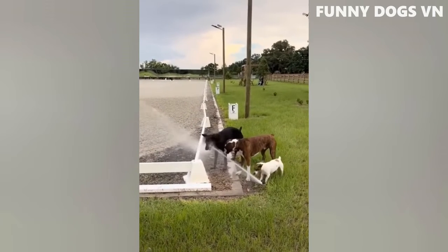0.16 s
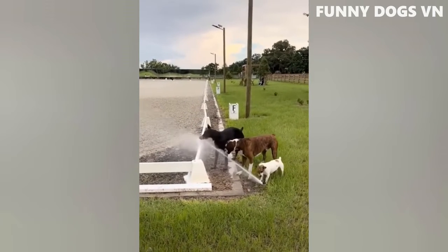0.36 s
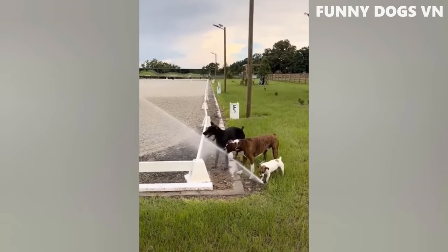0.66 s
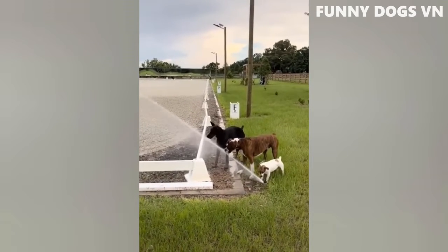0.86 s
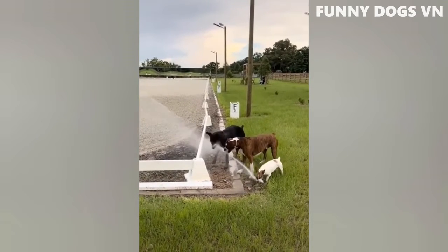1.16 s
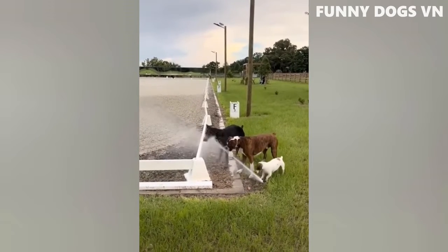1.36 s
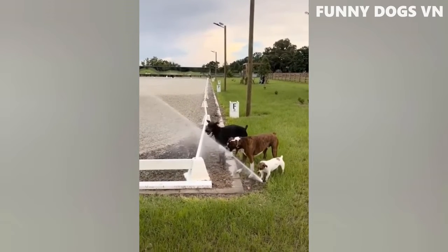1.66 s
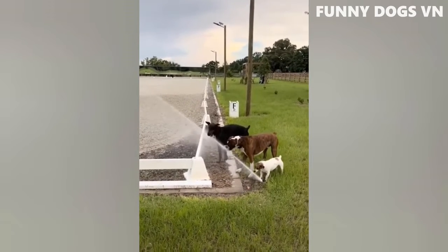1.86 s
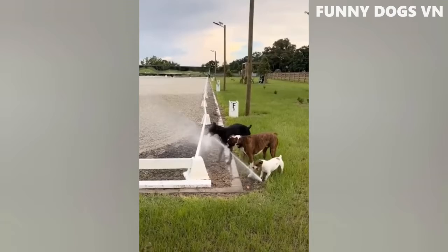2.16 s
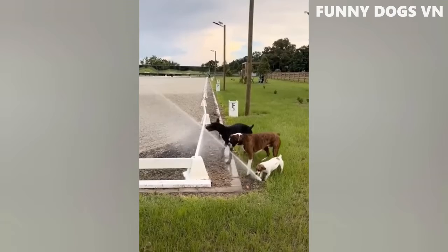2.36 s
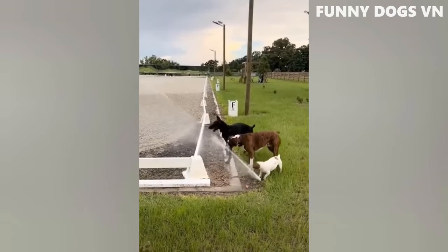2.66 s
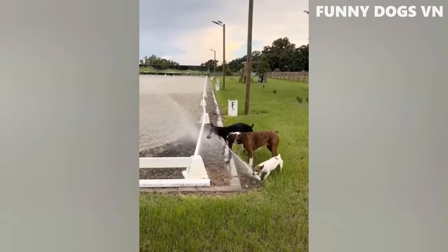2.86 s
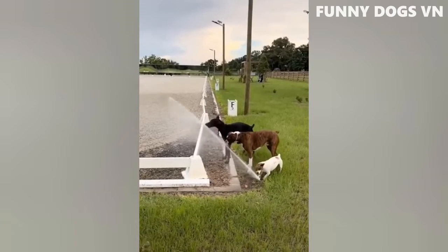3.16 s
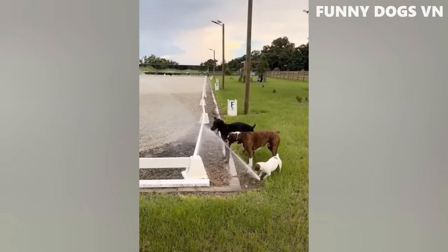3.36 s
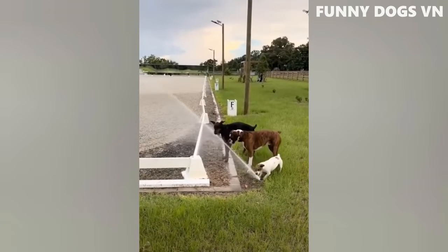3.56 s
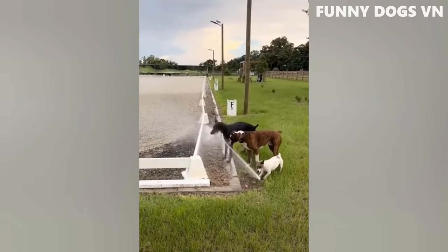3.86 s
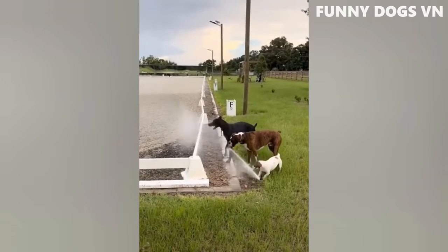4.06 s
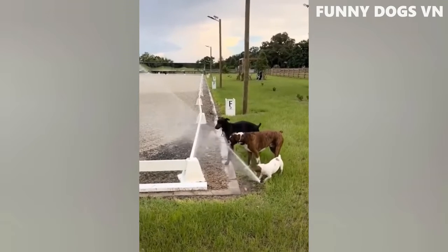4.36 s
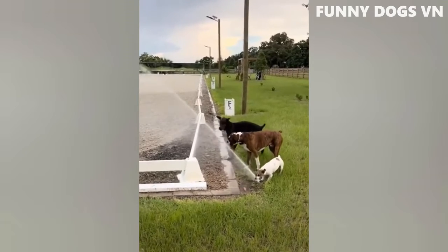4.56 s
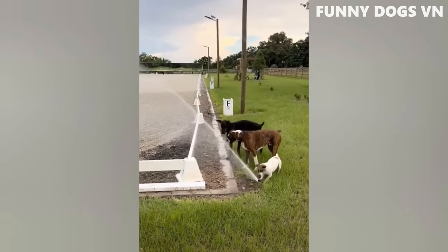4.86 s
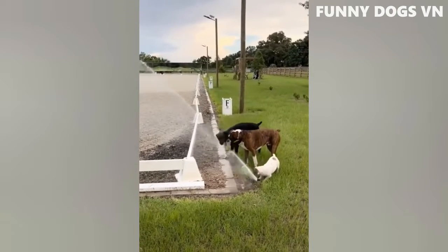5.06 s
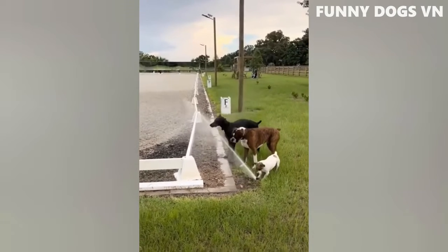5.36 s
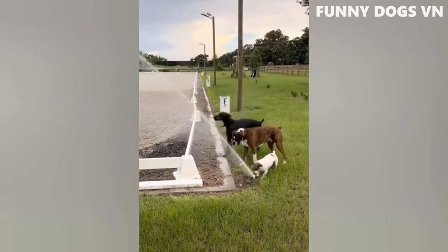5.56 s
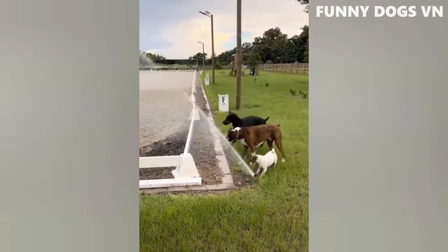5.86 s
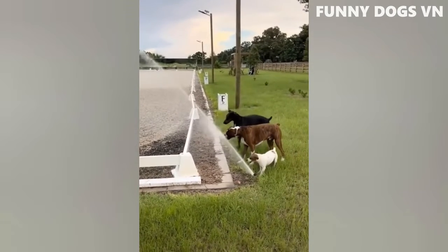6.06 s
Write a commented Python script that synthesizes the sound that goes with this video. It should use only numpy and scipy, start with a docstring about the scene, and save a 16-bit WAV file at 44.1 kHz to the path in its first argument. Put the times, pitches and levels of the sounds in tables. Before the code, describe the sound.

A lawn sprinkler hisses softly throughout over a low, uneven outdoor rumble, a few metres straight ahead in an open field with no echo. At 0.2 seconds a dog's quick bite breaks the jet into a rasping burst of drops. From 0.4 to 0.7 a muzzle stays in the water and the open mouth rings hollow. Jaws clop dully around 0.7 and 1.1 amid misty spurts. Further bites come near 1.4, 2.2 and 2.8, mixed with brief drinks and sharp wet slaps. The strongest, busiest stretch runs from 3.1 to 4.5, with splashy snaps, clops and a longer gargling drink just after 4. More snaps follow near 4.9 and 5.3, then another hollow drink at 5.4 and a clop at 5.7. Around 6 seconds paws thud softly twice on turf around one last bite, which trails into mist.

```python
"""Three dogs snap at the jet of a lawn sprinkler, a few metres away in an open field.
From the start the free jet hisses softly over a low outdoor rumble. A first quick bite breaks it into
a rasping burst of drops; then a muzzle stays in the water, the open mouth rings hollow, and jaws clop.
Bites and drinks keep trading places, with misty spurts between them and wet slaps on the jaws.
Near 6 s paws thud softly on the turf around one last bite."""
import sys
import numpy as np
from scipy import signal
from scipy.fft import rfft, irfft, next_fast_len
from scipy.io import wavfile
from scipy.ndimage import uniform_filter1d, map_coordinates

SR = 44100
rng = np.random.default_rng(int(sys.argv[2]) if len(sys.argv) > 2 else 0)


def transcribe(signal):
    """Save signal, clipped to [-1, 1], as a 16-bit WAV file at the path in sys.argv[1]."""
    frames = np.atleast_2d(signal).T
    limited = np.clip(frames, -1, 1)
    pcm = np.round(limited * 32767).astype(np.int16)
    wavfile.write(sys.argv[1], SR, pcm)


N = 274081


def amp(db):
    """Decibels to gain."""
    return 10 ** (np.asarray(db) / 20)


def unit(x):
    """Scale to rms 1."""
    return x / np.sqrt(np.mean(x ** 2) + 1e-20)


def eq_gain(points, hz):
    """Gain of an EQ curve whose (f/Hz, level/dB) points are joined on a log axis."""
    f, db = np.transpose(points)
    return amp(np.interp(np.log(hz + 1), np.log(f + 1), db))


def fader(points):
    """A fader ride through (t/s, level/dB) points, in dB for every sample."""
    return np.interp(np.arange(N) / SR, *np.transpose(points))


def wobble(rate):
    """A smooth random modulator, rate knots a second."""
    return map_coordinates(rng.standard_normal(int(N * rate / SR) + 4), [np.arange(N) * rate / SR])


def filtered(x, response):
    """Filter x by a response given as a function of frequency."""
    size = next_fast_len(N + SR // 2)
    return irfft(rfft(x, size) * response(np.fft.rfftfreq(size, 1 / SR)), size)[..., :N]


def add(track, s, sound):
    """Mix a sound into a track from time s on."""
    room = track[..., round(s * SR):][..., :sound.shape[-1]]
    room += sound[..., :room.shape[-1]]


# Bottom of the outdoor bed: f/Hz, level/dB
RUMBLE_EQ = [(18, -36), (30, -15), (42, -7.5), (58, 1), (95, -1), (130, -9), (200, -21), (400, -42)]
# Upper bass of the bed: f/Hz, level/dB
MURMUR_EQ = [(70, -11), (130, 0), (170, 0), (240, -2), (320, -7.5), (480, -17.5), (1000, -24.5),
             (3000, -55)]
# Fader ride on that upper bass: t/s, level/dB
MURMUR_RIDE = [(0, -49), (.7, -51), (1.45, -47.5), (2.55, -50), (2.87, -44.3), (3.3, -48.5), (3.85, -46.5),
               (4.75, -48.5), (5.12, -52.5), (5.4, -45), (6.21, -51)]

def rumble():
    """The open air rumbles in soft, uneven swells, dead centre."""
    def noise(eq):
        return unit(filtered(rng.standard_normal(N), lambda hz: eq_gain(eq, hz)))
    deep = amp(-45.9 + 1.1 * wobble(9)) * noise(RUMBLE_EQ)
    murmur = amp(fader(MURMUR_RIDE) + 2.3 * wobble(16)) * noise(MURMUR_EQ)
    return deep + murmur


def knocks(cues, t60, attack_s, rough):
    """Short, dull rings whose pitch is blurred by what sloshes or gives way."""
    out, t = np.zeros(N), np.arange(SR // 5) / SR
    for s, db, hz in cues:
        drift = rough * np.cumsum(rng.standard_normal(len(t))) / np.sqrt(SR)
        envelope = amp(db + 4.5 - 60 * t / t60) * (1 - np.exp(-t / attack_s))
        add(out, s, envelope * np.sin(2 * np.pi * hz * t + drift))
    return out


# Footfalls: t/s, relative level/dB, f/Hz
PAW_CUES = [(.400, -41, 72), (3.27, -40, 62), (5.858, -30.5, 70), (6.065, -36.5, 110)]

def paw_thuds():
    """Paws land softly on turf that gives way."""
    return knocks(PAW_CUES, t60=.15, attack_s=.008, rough=4.4)


# Stereo width of the water: f/Hz, side level against mid/dB
SPRAY_WIDTH = [(200, -38), (450, -9.5), (1200, -15.5), (2400, -56), (3200, -29), (4000, -15.5), (7000, -12),
               (11000, -12.5), (13500, -5.5)]

def spray(eq, rate, share, patchy_db):
    """Single drops (rate a second, share of the power) over a wash, coloured by a shifting surface."""
    drops = (rng.random((2, N)) < rate / SR) * rng.standard_normal((2, N))
    impacts = np.sqrt(share) * unit(drops) + np.sqrt(1 - share) * rng.standard_normal((2, N))
    frames = signal.stft(impacts, nperseg=1024)[2]
    patches = uniform_filter1d(rng.standard_normal(frames.shape[1:]), size=3, axis=0)  # across pitch
    patches = unit(uniform_filter1d(patches, size=7, axis=1))  # across time
    pair = signal.istft(frames * amp(patchy_db * patches), nperseg=1024)[1][:, :N]
    mid = filtered(pair[0], lambda hz: eq_gain(eq, hz))
    side = filtered(pair[1], lambda hz: eq_gain(eq, hz) * eq_gain(SPRAY_WIDTH, hz))
    return np.array([mid + side, mid - side]) / np.std(mid)


# Tone of the free jet: f/Hz, level/dB
JET_EQ = [(200, -4.5), (500, 2.5), (1000, 0), (2000, -4.5), (4500, 1), (6500, -3.5), (8500, -1.5),
          (10500, -6.5), (12500, 0.5), (15400, -6.5)]
# Fader ride on the free jet: t/s, level/dB
JET_RIDE = [(0, -44.5), (1.7, -44.5), (2.7, -42.5), (3.4, -44.5), (4.7, -44.3), (5.15, -45.7), (6.21, -45)]

def free_jet():
    """The unbroken jet hisses at the nozzle and rains down on the sand."""
    gain = amp(fader(JET_RIDE) + .55 * wobble(3.86))
    return gain * spray(JET_EQ, rate=500, share=.19, patchy_db=1.2)


# Jaws shutting: t/s, relative level/dB, f/Hz
CLOP_CUES = [(0.734, -34.5, 214), (1.066, -25, 200), (1.103, -44, 161), (1.385, -32, 288),
             (3.204, -32, 190), (3.566, -27, 360), (3.999, -36, 167), (4.654, -37, 152),
             (5.674, -30.5, 495), (5.691, -30, 394)]

def jaw_clops():
    """A closing mouth gives a hollow clop."""
    return knocks(CLOP_CUES, t60=.072, attack_s=.0044, rough=13)


# Wet hits: t/s, level/dB, 60 dB decay/s
SLAP_CUES = [(.170, -36, .12), (.729, -31.5, .06), (.762, -38, .05), (1.068, -39, .06), (1.600, -21, 0.038),
             (1.936, -29.5, .05), (2.338, -25, .08), (2.803, -27.5, 0.12), (2.94, -28.5, 0.21),
             (3.172, -20, 0.034), (3.201, -22, 0.05), (3.250, -32, 0.071), (3.501, -23, .06),
             (3.616, -30, 0.08), (4.0, -26, .04), (4.356, -30, 0.14), (4.65, -39.5, .13),
             (4.853, -25.5, 0.11), (5.247, -24.5, 0.073), (5.674, -35, 0.07), (5.915, -22, .08),
             (6.028, -28, 0.092)]

def water_slaps(attack_s=.0013):
    """A slug of water bursts on a jaw and patters away."""
    envelope, t = np.zeros(N), np.arange(SR // 4) / SR
    for s, db, t60 in SLAP_CUES:
        add(envelope, s, amp(db - 60 * t / t60) * (1 - np.exp(-t / attack_s)))
    wet_eq = [(150, -21), (400, -5.5), (1000, -3.5), (3000, 2.5), (8500, .5), (15000, -6.5)]
    return envelope * spray(wet_eq, rate=1500, share=.5, patchy_db=2.5)


# Open mouths: start t/s, end t/s, low f/Hz, middle f/Hz, top f/Hz, relative level/dB, upper two trim/dB
GAPE_CUES = [(.355, .68, 1110, 1900, 2900, -29.3, -3), (1.425, 1.53, 1200, 1800, 2900, -31, -9),
             (2.325, 2.535, 930, 1770, 2630, -37, 6.3), (3.1, 3.215, 1170, 1690, 3180, -28.5, .5),
             (3.275, 3.36, 1030, 1750, 2570, -37, -1), (4.078, 4.135, 960, 1700, 2800, -26, -13),
             (4.16, 4.33, 1050, 1630, 3000, -40, 4), (5.415, 5.545, 1170, 1800, 3200, -30.3, -8),
             (5.668, 5.85, 880, 1720, 2780, -57, 5.5)]
# Resonances, entering low to top: start/share of gape, end/share of gape, pitch sag/share, trim/dB
FORMANTS = [(0, .82, .14, 0), (.06, .97, .05, -1), (.25, .99, .04, 0)]

def open_mouths(half_width_hz=138, trim_db=-1.5, gargle=.018, side_db=-19.5):
    """Water drums inside an open mouth, whose resonances glide with the jaw and waver as it fills."""
    out = np.zeros((2, N))
    pole = np.exp(-2 * np.pi * half_width_hz / SR)
    slosh = 1 + gargle * wobble(45)
    for opens, closes, *pitches, db, upper_db in GAPE_CUES:
        for hz, extra_db, (first, last, sag, formant_db) in zip(pitches, (0, upper_db, upper_db), FORMANTS):
            start = opens + first * (closes - opens)
            n = max(round((last - first) * (closes - opens) * SR), SR // 100)
            glide_hz = np.linspace(hz, hz * (1 - sag), n) * slosh[round(start * SR):][:n]
            carrier = np.exp(2j * np.pi * np.cumsum(glide_hz) / SR)
            # a gliding band-pass: shift the noise down, low-pass it, shift it back
            drive = rng.standard_normal((2, n)) / carrier
            ring = np.real(signal.lfilter([1], np.poly([pole, pole]), drive) * carrier)
            envelope = amp(db + extra_db + formant_db + trim_db) * signal.windows.tukey(n, .5)
            add(out, start, envelope * ring / ring.std(axis=1, keepdims=True))
    mid, side = out[0], amp(side_db) * out[1]
    return np.array([mid + side, mid - side])


def burst(s, hold, rise, fall, swell_db=0):
    """Start time and power envelope of one burst of spray; rise and fall are seconds per 20 dB."""
    hold, start = max(hold, 1 / SR), max(s - 2 * rise, 0)
    t = np.arange(start - s, hold + 2 * fall, 1 / SR)
    edges = np.maximum(-t, 0) / rise + np.maximum(t - hold, 0) / fall
    tilt_db = swell_db * (np.clip(t / hold, 0, 1) - .5)
    return start, amp(tilt_db - 20 * edges) ** 2


# Misty swells, spurts and trailing patter: peak t/s, rise/s, fall/s, level/dB
SPURT_CUES = [(.015, .136, .26, -48), (.286, .035, .138, -36.5), (.906, .24, .114, -37.3),
              (1.047, .151, .342, -44.5), (1.224, .144, .238, -38.4), (1.601, .044, .057, -31),
              (1.935, .088, .059, -36), (2.052, .231, .366, -45), (2.946, .034, .098, -33.5),
              (3.622, .021, .084, -42), (3.659, .058, .403, -48), (4.363, .03, .06, -33.8),
              (4.413, .107, .55, -46.5), (4.982, .06, .088, -47), (6.03, .024, .09, -37.5),
              (6.198, .143, .139, -46)]

def spurts(body_db=-3.7, mist_db=3.2):
    """Misty spray swells and trails off between and after bites: power of body, splash and mist."""
    power = np.zeros((3, N))
    for s, rise, fall, db in SPURT_CUES:
        start, shape = burst(s, 0, rise, fall)
        add(power, start, amp([[db + body_db], [db], [db + mist_db]]) ** 2 * shape)
    return power


# Held touches: t/s, hold/s, fall/s, level/dB, swell over the hold/dB, body trim/dB, mist trim/dB
DRINK_CUES = [(.379, .103, .113, -31.3, 5.5, -1.7, -.3), (.505, .151, .05, -31.7, -3, 0, .3),
              (1.373, .056, .058, -34.5, 0, -3.5, 2), (1.64, .049, .107, -31.5, -1.5, -5.3, .5),
              (2.129, .05, .068, -35, 3.5, -5.3, 3.5), (2.345, .148, .062, -32.7, -2, -.5, 1.8),
              (3.275, .076, .071, -33.2, 2, -7, 2.7), (4.026, .046, .075, -27.3, 0, -2.5, -1.5),
              (4.122, .18, .048, -26.8, 2, -6.2, 1), (5.379, .169, .088, -31.3, -5, -3.7, 2.6),
              (5.688, .007, .1, -40, 0, 2.5, -17)]

def drinks(rise_s=.035):
    """A muzzle stays in the jet: power of body, splash and mist."""
    power = np.zeros((3, N))
    for s, hold, fall, db, swell_db, body_db, mist_db in DRINK_CUES:
        start, shape = burst(s, hold, rise_s, fall, swell_db)
        add(power, start, amp([[db + body_db], [db], [db + mist_db]]) ** 2 * shape)
    return power


# Quick snaps: t/s, hold/s, level/dB, body trim/dB, mist trim/dB
BITE_CUES = [(.184, .065, -27.5, 0, .5), (1.446, .078, -25.3, -2.5, 1.8), (2.217, .05, -26.5, -.5, 1.5),
             (2.82, .067, -26.2, -.5, 0), (3.107, .096, -23, -1.5, -1.3), (3.515, .044, -26, -1, -1.5),
             (3.893, .047, -24, .9, -1.6), (4.526, .045, -24.8, -.5, -1.5), (4.867, .037, -27, 0, -1.2),
             (5.262, .051, -28.6, 1.3, 2), (5.923, .052, -27, -1.8, 3.2)]
# Envelope of each layer of a bite: trim/dB, late start/s, early end/s, rise/s, fall/s
BODY_SHAPE = (-5.5, .002, .012, .032, .053)
SPLASH_SHAPE = (0, 0, 0, .028, .044)
MIST_SHAPE = (-.7, .009, 0, .043, .048)

def bites():
    """Jaws cut through the jet, drumming first and ending in mist: power of body, splash and mist."""
    power = np.zeros((3, N))
    for s, hold, db, body_db, mist_db in BITE_CUES:
        layers = zip(power, (body_db, 0, mist_db), (BODY_SHAPE, SPLASH_SHAPE, MIST_SHAPE))
        for layer, trim_db, (layer_db, late, early, rise, fall) in layers:
            start, shape = burst(s + late, hold - late - early, rise, fall)
            add(layer, start, amp(db + layer_db + trim_db) ** 2 * shape)
    return power


# Floor of stray drops that always land on the dogs: body level/dB, splash level/dB, mist level/dB
DRIZZLE = (-59, -59, -54)
# Tone of the heavy, small and finest drops: f/Hz, level/dB
BODY_EQ = [(60, -59), (200, -8.5), (380, -6), (520, -7), (720, -1.5), (1050, 0.5), (1350, -3), (1750, 2),
           (2200, -4), (3000, -4.5), (6000, -60)]
SPLASH_EQ = [(600, -63), (1500, -20), (2300, -3), (3200, 0), (4200, -2.5), (5000, 0), (5600, -4.5),
             (6800, -12.5), (10000, -41)]
MIST_EQ = [(3000, -40), (5200, -16), (6500, -4.5), (7800, 1), (9200, -1.5), (10400, -5), (11500, -6.5),
           (12400, -4.5), (14000, -7), (15400, -7)]

def broken_jet():
    """Heavy drops drum on fur, smaller ones splash, and the finest fizz away as mist."""
    power = amp(DRIZZLE)[:, None] ** 2 + spurts() + drinks() + bites()
    body, splash, mist = np.sqrt(power)
    slugs = wobble(170)  # the jet arrives in uneven slugs of water: the rasp
    body *= amp(-.07 + .64 * slugs)
    splash *= amp(-.08 + .27 * slugs)
    mist *= amp(1.15 + .5 * slugs)
    water = (body * spray(BODY_EQ, rate=700, share=.36, patchy_db=3)
             + splash * spray(SPLASH_EQ, rate=1100, share=.23, patchy_db=3)
             + mist * spray(MIST_EQ, rate=2100, share=.2, patchy_db=3.16))
    return amp(.6 * wobble(35)) * water  # the heads never keep still


def scene():
    """The dry mix: everything lies straight ahead, with no walls to answer."""
    water = free_jet() + broken_jet() + water_slaps()
    return water + open_mouths() + jaw_clops() + paw_thuds() + rumble()


# Send to the stereo widener: f/Hz, level/dB
WIDENER_EQ = [(300, -44), (2600, -18), (4000, -6), (7000, -6.5), (8700, -4.5), (11500, -3), (13000, -3)]
# Narrow treble cuts: f/Hz, half width/Hz, depth/dB
NOTCHES = [(5960, 244, 38.5), (10480, 370, 22), (11500, 218, 28)]

def record(dry):
    """Master bus: delayed treble goes left and right in opposite polarity, then notches and a high cut."""
    def widener(hz):
        delay_s = np.where(hz < 12000, .0202, .00145)
        return eq_gain(WIDENER_EQ, hz) * np.exp(-2j * np.pi * hz * delay_s)

    def master_eq(hz, high_cut_hz=15550):
        cut_db = sum(depth * np.exp(-((hz - centre) / width) ** 4) for centre, width, depth in NOTCHES)
        return amp(-cut_db) * (hz < high_cut_hz)

    side = filtered(dry.mean(axis=0), widener)
    return filtered(dry + np.array([side, -side]), master_eq)


dry = scene()
out = record(dry)
transcribe(out)
```